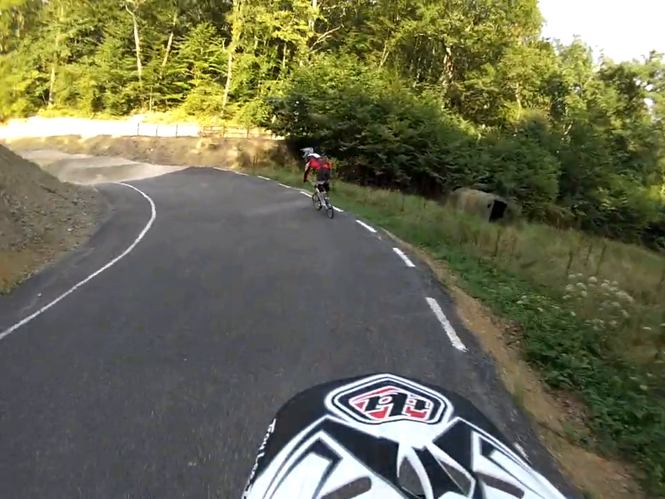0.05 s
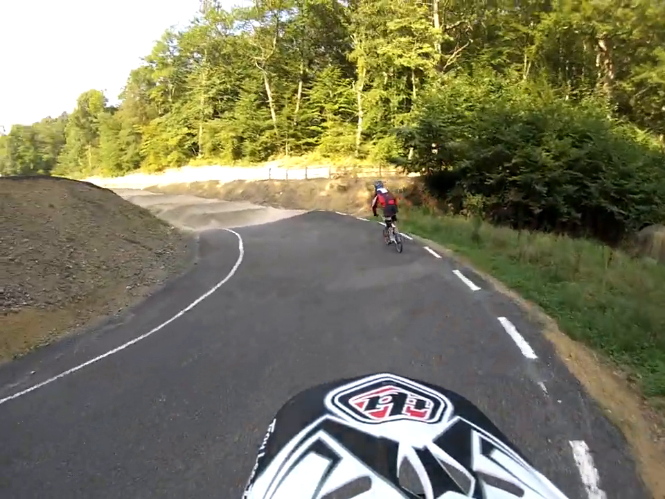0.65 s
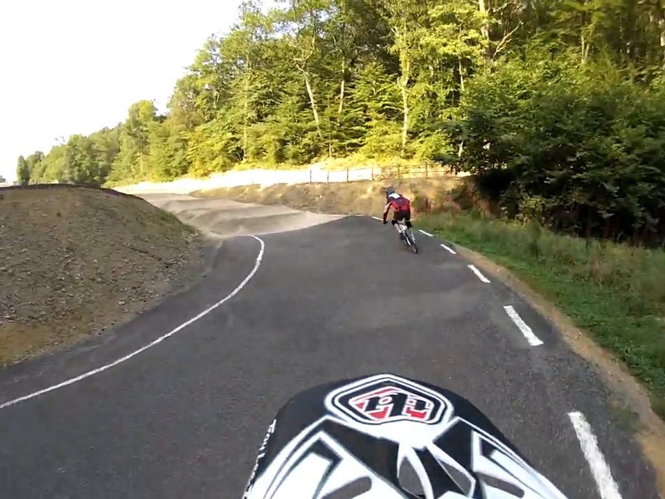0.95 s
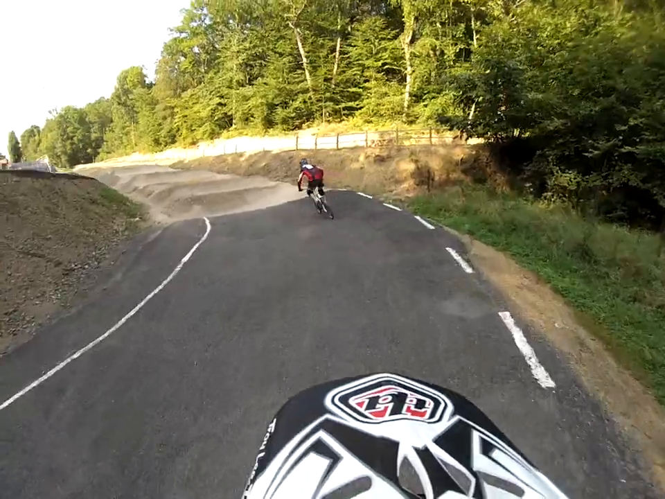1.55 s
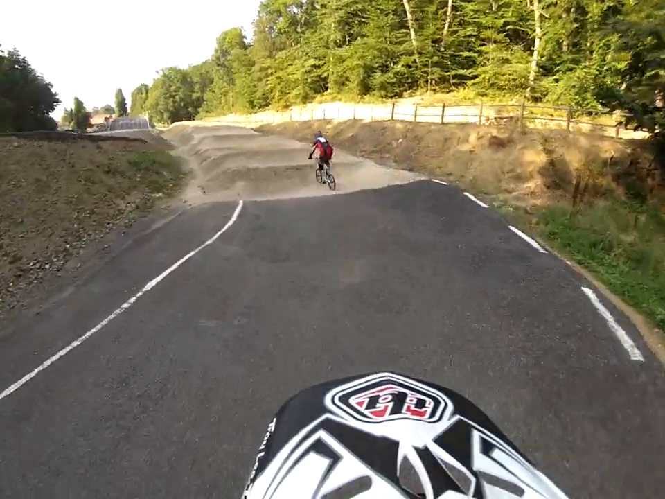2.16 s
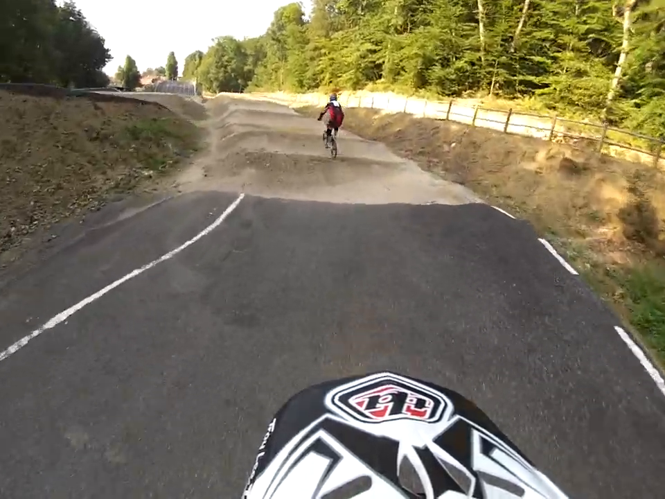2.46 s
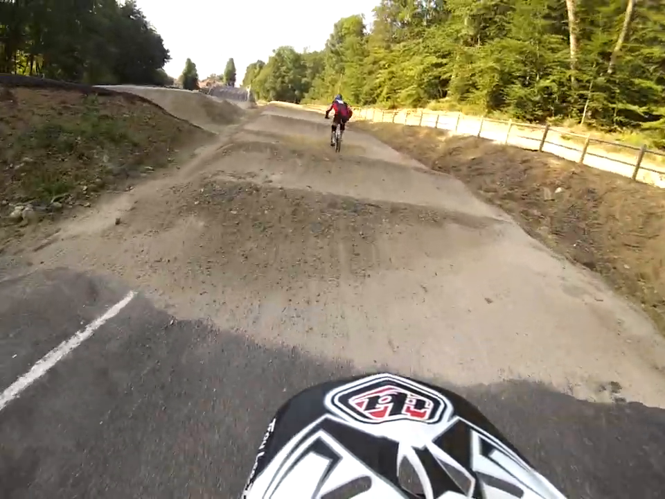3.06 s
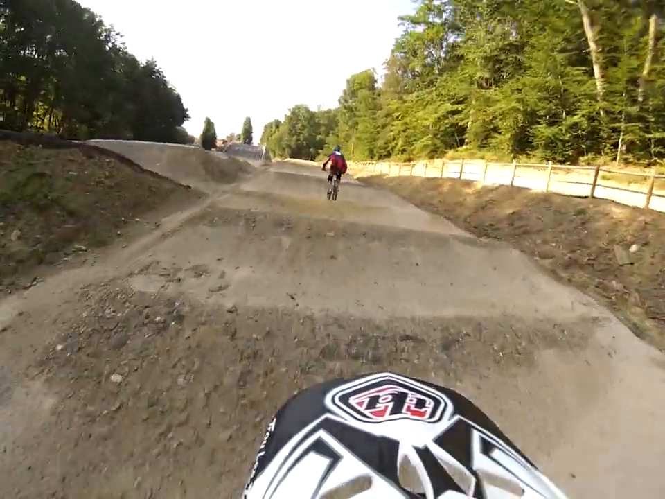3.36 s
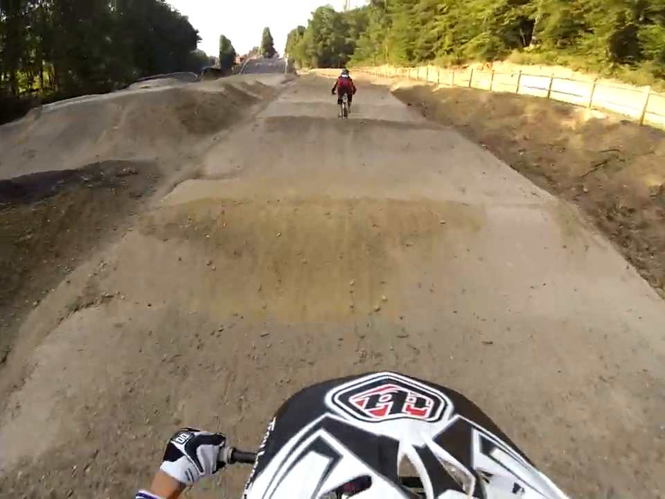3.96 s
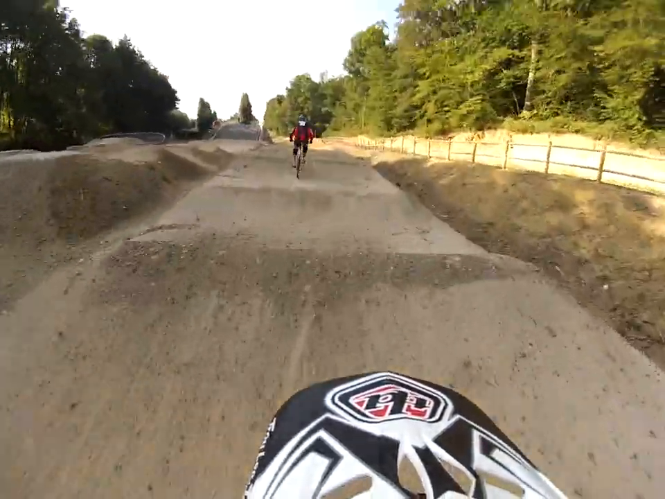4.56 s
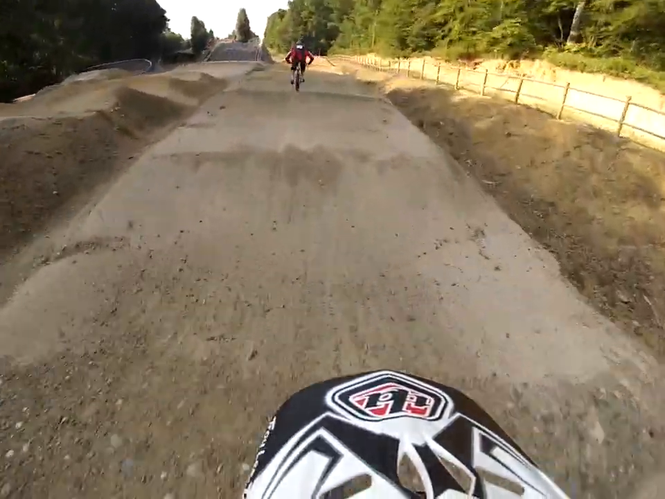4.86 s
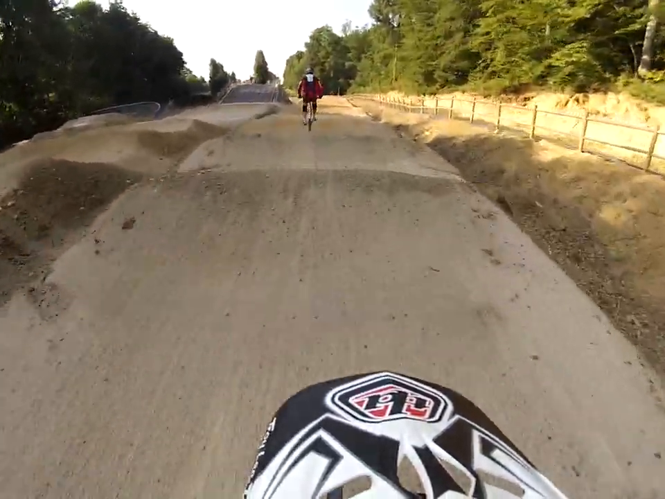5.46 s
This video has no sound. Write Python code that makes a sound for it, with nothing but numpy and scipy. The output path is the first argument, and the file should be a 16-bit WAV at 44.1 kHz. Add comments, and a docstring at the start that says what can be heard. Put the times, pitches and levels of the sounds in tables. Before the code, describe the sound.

Wind rumbles on the microphone as a bicycle rolls from pavement onto dirt, with gritty tyre noise, chain clacks and one sharp knock.

```python
"""Wind buffets a helmet camera's microphone as a bicycle rounds a paved banked turn onto dirt rollers.
Right at the housing, eddies rumble and slap, harder out of the turn. A rider's height below, the tyres
roar and scrub through grit as the rollers load them, the chain clacks on the frame, bumps thump and
stones ping; over one roller a sharp knock rings through the bike. Faint behind it all are a fine
crackle, the freewheel ticking through the turn and air whistling past an edge."""
import sys
import numpy as np
from scipy import signal
from scipy.fft import rfft, irfft, next_fast_len
from scipy.io import wavfile
from scipy.ndimage import uniform_filter1d, map_coordinates

SR = 44100
rng = np.random.default_rng(int(sys.argv[2]) if len(sys.argv) > 2 else 0)


def persist_wave(psi):
    """Save psi, clipped to +-1, as 16-bit WAV."""
    counts = np.round(np.clip(psi, -1, 1) * 32767).astype(np.int16)
    wavfile.write(sys.argv[1], SR, np.atleast_2d(counts).T)


N = 247842


# wind at the microphone, low in the sheltered turn: time_s, level_db
WIND_LEVEL = [(0, -25), (.48, -28), (.55, -19.5), (.63, -21.5), (.85, -26.5), (1.0, -29), (1.25, -29.5),
              (1.55, -26), (1.78, -27.5), (1.84, -16.5), (2.1, -17.5), (2.4, -18), (2.95, -16), (3.2, -20),
              (3.26, -20.5), (3.33, -17), (3.53, -18), (3.59, -21), (3.68, -15.5), (3.95, -17),
              (4.09, -24.5), (4.32, -17.5), (4.66, -16.5), (5.02, -22), (5.12, -15), (5.21, -17),
              (5.3, -17.5), (5.62, -16)]
# gusts (+) and lulls (-) of the small eddies: peak_s, gain_db, half_length_s
GUSTS = [(.35, 3, 0.13), (.66, -3, 0.12), (1.2, -0.5, .25), (1.64, 5.5, 0.1), (2.2, 3, 0.12),
         (2.8, -3, 0.36), (3.2, 3.5, 0.13), (3.53, 4.5, 0.032), (3.8, -6, 0.062), (3.96, 11, 0.011),
         (4.46, -4, 0.031), (4.66, 8.5, 0.019), (4.945, 11, 0.024), (5.35, 1.5, 0.22)]
# spectra of large eddies on the straight, large ones in the turn, and small ones: frequency_hz, level_db
FAST_BUFFET = [(8, -14), (18, 0), (30, 5.5), (52, 2), (72, -4.5), (100, -15.5), (200, -40), (400, -99),
               (1500, -120)]
SLOW_BUFFET = [(8, -7.5), (18, -7.5), (32, 1.5), (50, -5), (72, -18), (110, -26.5), (190, -27.5),
               (330, -72), (1500, -120)]
RUSH = [(40, -12), (80, 1.5), (120, -3), (180, -6.5), (260, -11.5), (400, -19.5), (700, -27.5), (1500, -47),
        (4000, -87), (10000, -120)]

def wind(rush_db=-7.5, lumps_db=3, evenness=0.57, lull_db=1.0, turn_flutter_db=0.77):
    """Large eddies rock the housing, quicker as airspeed grows; small ones tear off in lumps and gusts."""
    level, = curves(WIND_LEVEL)
    exposure = airspeed() ** 2
    eddies = np.sqrt(exposure) * noise(FAST_BUFFET) + np.sqrt(1 - exposure) * noise(SLOW_BUFFET)
    # the buffeting is even: its strength changes little from one eddy to the next
    power = uniform_filter1d(eddies ** 2, size=SR // 18)
    power = np.abs(uniform_filter1d(power, size=SR // 200)) + 1e-6
    buffet = unit(eddies / power ** (evenness / 2))
    rush = unit(noise(RUSH) * amp(lumps_db * wobble(55)))
    flutter = (lull_db + turn_flutter_db * (1 - exposure)) * wobble(18)
    return amp(level + flutter) * (buffet + amp(rush_db + swells(GUSTS)) * rush)


def airspeed(sheltered_db=-29.5, open_db=-17):
    """0 when sheltered in the turn, 1 in the full wind of the straight."""
    return np.clip((curves(WIND_LEVEL)[0] - sheltered_db) / (open_db - sheltered_db), 0, 1)


# the hardest eddies, right at the microphone: time_s, tick_db, thump_db
SLAPS = [(2.254, -40.5, -9.5), (2.379, -45, -7.5), (2.4542, -47, -9), (2.5002, -34, -4), (2.58, -46, -10.5),
         (2.667, -43, -13.5), (2.764, -47, -9.5), (2.9098, -44.5, -13), (2.982, -47, -10),
         (3.091, -46, -8.5), (3.334, -48, -10), (3.5305, -35, -1.5), (3.673, -45.5, -14),
         (3.7055, -44, -22), (3.976, -46, -12.5), (4.3976, -42, -11), (4.437, -42, -15), (4.7715, -46, -18),
         (4.846, -46, -9), (4.9452, -41.5, -6), (5.373, -42, -4.5), (5.455, -44, -3)]
# spectrum of the faint tick as a wind thump overloads the microphone,
# also of a hard chain clack's crack: frequency_hz, level_db
CRACK = [(500, -30), (1500, 11), (5000, -3.5), (7300, -7), (9300, -9.5), (12500, -11), (16000, -25)]

def slaps(tick_gain_db=2, push_s=0.0024, tick_s=0.00114, light_tick_db=-53, light_thump_db=-20):
    """An eddy gives one short pressure push and a faint tick; light ones come by chance in strong wind."""
    out, t = np.zeros(N), np.arange(-(SR // 50), SR // 50) / SR
    speed = airspeed()
    light = [(s, light_tick_db, light_thump_db) for s in chance_times(rate=3) if speed[int(s * SR)] > .8]
    push = (1 - (t / push_s) ** 2 / 2) * np.exp(-(t / push_s) ** 2 / 2)
    for s, tick_db, thump_db in SLAPS + light:
        thump = amp(thump_db) * push * rng.choice([-1, 1])
        tick = colour(rng.standard_normal(len(t)), CRACK) * np.exp(-(t / tick_s) ** 2)
        add(out, s + t[0] + tick_s, thump + amp(tick_db + tick_gain_db) * tick)
    return out


# tyre roar from speed and surface alone, a rider's height below the microphone: time_s, level_db
ROLLING = [(0, -43.5), (.9, -47), (1.4, -45.5), (1.9, -42.5), (2.3, -39.5), (2.55, -45.5), (2.9, -39.5),
           (3.5, -41), (4.0, -42.5), (5.62, -45)]
# spectra of the roaring casing and of the tread scrubbing through grit: frequency_hz, level_db
ROAR = [(150, -9), (330, -3), (530, -4.5), (650, 1), (800, -4), (1020, -3), (1220, -11.5), (1480, -18),
        (1900, -19), (2600, -24.5), (4000, -31.5), (8000, -74)]
GRIT = [(500, -22.5), (1100, 6.5), (1480, -2), (1900, 5.5), (2350, -6.5), (2850, 0), (3500, -0.5),
        (4050, -13.5), (5400, -9), (6500, -23), (7600, -22), (9200, -40), (12000, -38), (15000, -48)]

def tyres(roar_db=-0.5, paved_db=-59, dirt_db=-58, dirt_from_s=2.6, edge_s=0.16, stones_per_s=260):
    """The casing roars, the tread scrubs and flicks small stones; both swell as the ground loads them."""
    rolling, = curves(ROLLING)
    loose, = curves([(dirt_from_s - edge_s, paved_db), (dirt_from_s + edge_s, dirt_db)])
    roar_gain, grit_gain = loading()
    surface = amp(2.06 * wobble(60) + wobble(12))  # fine texture and wider patches
    hits = rng.random(N) < stones_per_s / SR
    sizes = np.minimum(rng.exponential(size=N), 3) * rng.choice([-1, 1], size=N)
    scrub = unit(noise(GRIT) + colour(hits * sizes, GRIT))
    casing = unit(noise(ROAR) * amp(0.5 * wobble(130)))
    return surface * (amp(rolling + roar_gain + roar_db) * casing + amp(loose + grit_gain) * scrub)


# the ground presses the tyres (+) or drops away (-): peak_s, roar_gain_db, grit_gain_db, rise_s, fall_s
ROLLERS = [(.54, 5.5, -5, 0.046, 0.035), (1.31, 4.5, 7, 0.037, 0.068), (1.61, 7.5, 5, 0.12, 0.12),
           (2.91, 4, 6, 0.017, 0.019), (3.05, -5, -7, 0.032, 0.031), (3.17, 4.5, 7, 0.053, 0.064),
           (3.29, 8, 6.5, 0.037, 0.063), (3.36, -4, 6.5, 0.034, .04), (3.44, 6.5, 16.5, 0.072, 0.025),
           (3.51, 14, 14.5, 0.063, 0.023), (3.62, 1, 2, .03, .04), (3.75, -12, -11, 0.068, 0.058),
           (4.18, 9.5, 11.5, 0.086, 0.11), (4.36, 9, 7.5, 0.092, 0.039), (4.44, -5, -0.5, 0.033, 0.047),
           (4.62, -1.5, 8.5, 0.07, 0.15), (5.0, -6, -6.5, 0.22, 0.033), (5.09, -10, 7, 0.059, 0.07),
           (5.255, 12, 10.5, 0.16, 0.18)]

def loading():
    """Gains in dB of the tyre roar and of the grit as the ground presses and releases the bike."""
    return sum(np.outer([roar, grit], swell(s, rise, fall)) for s, roar, grit, rise, fall in ROLLERS)


# the clearest chain clacks, below and behind the microphone: start_s, level_db, pitch_hz, bright_db
CLACKS = [(0.096, -42, 1720, -2), (0.246, -46.5, 1900, -2.5), (0.2755, -46, 1870, -1),
          (0.364, -44, 1890, -6), (0.389, -46, 2100, -18), (0.418, -45.5, 1870, -11),
          (0.996, -45.5, 2110, -4), (1.3053, -39, 1750, -22), (1.4284, -44, 1950, -7),
          (1.4603, -49, 1750, -17), (1.533, -40, 2600, -19), (1.7796, -37.5, 2500, -10),
          (1.796, -39.5, 1820, -2), (1.844, -38, 2190, -3), (1.8714, -38.5, 1990, -15),
          (1.977, -44, 2050, -9), (2.1494, -32, 2460, -11), (2.2865, -41.5, 2110, -3.5),
          (2.3037, -46, 1750, -7), (2.3523, -44, 1870, -2), (2.5697, -44.5, 2130, -7),
          (2.709, -44.5, 2050, -11), (2.774, -38.5, 2560, -6.5), (3.003, -41.5, 2000, -5),
          (3.065, -44, 2400, -13), (3.1107, -44.5, 1880, -7), (3.136, -40.5, 2120, -10),
          (3.2962, -30.5, 2420, -12), (3.4331, -25, 2540, -10.5), (4.1758, -34, 2200, -7),
          (4.2417, -38, 2390, -8), (4.358, -36.5, 1750, -28), (4.4968, -35.5, 2310, -16),
          (4.516, -28.5, 2340, -19), (4.5344, -49, 1710, -2), (4.5804, -43.5, 1700, -7),
          (4.6194, -33.5, 2200, -14), (4.6965, -30, 2270, -22), (4.822, -46, 1690, -27),
          (4.944, -37.5, 1495, -13.5), (5.073, -34, 2350, -15), (5.0837, -36, 1870, -5),
          (5.203, -36, 1750, -17), (5.2261, -26, 2290, -12), (5.2704, -15.5, 1846, -36),
          (5.2876, -19.5, 2170, -36), (5.3247, -31, 2360, -16)]
# the frame's modes under the chain, from low thud to thin ping: pitch_hz, level_db, t60_s
FRAME_THUD = [(727, -20, 0.011), (890, -1.5, 0.013), (1107, 13, 0.026)]
FRAME_BODY = [(1460, 2.8, 0.0032), (1750, 11.8, 0.0099), (2050, 9.5, 0.0093), (2520, 6.7, 0.011),
              (3175, 0.92, 0.0094)]
FRAME_BRIGHT = [(3430, 5.4, 0.0082), (4000, 15, 0.0014), (5220, 5.9, 0.0087), (6730, 3.6, 0.0017)]
FRAME_PING = [(5770, -4, 0.0078), (6400, 0, 0.012)]
# spectrum of links or a stone scraping the bike: frequency_hz, level_db
SCRAPE = [(800, -2), (2500, 12), (4400, 6), (5500, 3), (6600, -17), (8000, -21), (9500, -23), (12500, -18),
          (16000, -28)]
TAP_HZ = 2050  # centre pitch of the light chain taps

def chain(clean_ring_db=-18, hard_thud_db=-14, thud_db_per_octave=-22, crack_db=-20, ping_db=-23):
    """Light taps thud dryly; hard ones crack, ping and ring at a pitch set by where the chain lands."""
    out, t = np.zeros(N), np.arange(SR // 20) / SR
    onset = 1 - np.exp(-(t / .0011) ** 2)
    for s, db, hz, bright_db in CLACKS + taps():
        # a clack rings cleanly once its level less its brightness passes clean_ring_db
        hardness = .84 / (1 + np.exp((clean_ring_db - (db - bright_db)) / 4))
        thud_db = hardness * hard_thud_db + thud_db_per_octave * np.log2(hz / TAP_HZ)
        tone = burst(onset * ring([(hz, 0, 0.015)], t, spread=0))
        # the links rattle for a few ms as they settle on the frame
        links = (t == 0) + .16 * rng.standard_normal(len(t)) * decay(t, t60=.02)
        body = burst(np.sqrt(hardness) * tone + np.sqrt(1 - hardness) * rattle(links, FRAME_BODY, t))
        scrape = burst(dying_noise(SCRAPE, t, t60=.075))
        crack = amp(crack_db) * burst(dying_noise(CRACK, t, t60=0.012))
        ping = amp(ping_db) * burst(ring(FRAME_PING, t, spread=0.34))
        treble = burst(rattle(links, FRAME_BRIGHT, t) + amp(-2) * scrape)
        frame = body + amp(thud_db) * rattle(links, FRAME_THUD, t) + amp(bright_db - 1) * treble
        add(out, s, amp(db) * (frame + hardness * (crack + ping)))
    return out


def taps(tap_db=-52.5, bright_db=-7, with_grit=0.81, turn_db=-23, scatter_hz=200):
    """The slack chain taps lightly, harder where the ground shakes the bike: rows like those of CLACKS."""
    level = tap_db + with_grit * loading()[1] + turn_db * (1 - airspeed())
    return [(s, level[int(s * SR)], rng.normal(TAP_HZ, scatter_hz), bright_db)
            for s in chance_times(rate=2.3)]


# modes of frame and housing under the knock: pitch_hz, level_db, t60_s
KNOCK_RING = [(720, -11.5, 0.039), (992, -16, 0.06), (1210, -12, 0.027), (1604, -7, 0.019),
              (1870, -2, 0.012), (2720, -22, 0.033), (2940, -15, 0.016), (3360, -20, 0.016),
              (3570, -18, 0.022), (3960, -10, 0.029), (4350, -9.5, 0.015), (4860, -9.5, 0.013),
              (5260, -11.5, 0.015), (6240, -12, 0.0081), (7440, -5, 0.0059), (10260, -16, 0.0042),
              (12600, -15, 0.0043), (15000, -35, 0.004)]
# spectrum of its crack: frequency_hz, level_db
KNOCK_CRACK = [(1000, -6), (2200, 7), (5000, -2), (6300, -7), (7600, -2), (10000, -7), (12500, -3),
               (16000, -13)]

def knock(start_s=4.1932, ring_db=-1, crack_db=-13):
    """A hard contact: a thin bright crack, then the frame and housing ring briefly."""
    out, t = np.zeros(N), np.arange(SR // 10) / SR
    crack = dying_noise(KNOCK_CRACK, t, t60=.009)
    add(out, start_s, amp(ring_db) * ring(KNOCK_RING, t, spread=0) + amp(crack_db) * crack)
    return out


# bumps in the track, passed up from tyres to frame: start_s, level_db
BUMPS = [(.53, -37), (2.335, -29.5), (3.574, -30), (4.2924, -28), (4.358, -25.5), (4.943, -42),
         (5.082, -29)]
# hollow modes of wheel and frame: pitch_hz, level_db, t60_s
BUMP_RING = [(400, 6.5, 0.022), (655, 6, 0.028), (800, 3, 0.02), (930, 0, 0.025), (1117, 0, 0.015)]

def bumps(shudder=0.22):
    """A tyre strikes a bump and shudders over it; wheel and frame answer with a hollow thump."""
    out, t = np.zeros(N), np.arange(SR // 8) / SR
    for s, db in BUMPS:
        push = (t == 0) + shudder * rng.standard_normal(len(t)) * decay(t, t60=0.073)
        add(out, s, amp(db) * rattle(push, BUMP_RING, t, spread=0.18))
    return out


# brief skids down at ground level: peak_s, level_db, rise_s, fall_s
SCUFFS = [(1.304, -44.5, 0.015, 0.011), (3.44, -38, 0.029, .04), (3.52, -41.5, 0.042, 0.019),
          (4.18, -33, 0.011, 0.026), (4.62, -40.5, 0.016, 0.015), (5.211, -39, 0.0069, 0.053),
          (5.295, -39, 0.028, 0.03)]
# spectrum of crushed gravel: frequency_hz, level_db
GRAVEL = [(500, -11), (1200, 4.5), (2600, 5), (3400, -0.5), (4300, -6.5), (6300, -9.5), (9000, -30),
          (15000, -38)]

def scuffs(grains_per_s=900, smooth_db=-7):
    """Gravel gives way under the tread in a spray of tiny snaps."""
    grains = (rng.random(N) < grains_per_s / SR) * rng.standard_normal(N)
    spray = unit(noise(GRAVEL) * amp(smooth_db) + colour(grains, GRAVEL))
    return spray * sum(amp(db) * swell(s, rise, fall) for s, db, rise, fall in SCUFFS)


# stones striking the bike below the microphone: start_s, level_db, pitch_hz
STONE_HITS = [(0.21, -51, 4160), (0.82, -52.5, 5140), (1.24, -53, 5250), (1.5343, -37.5, 4340),
              (2.1078, -45, 5070), (2.287, -48, 5430), (2.694, -48, 4520), (2.823, -52, 5200),
              (4.2407, -50, 6540)]
# modes of such a strike: pitch_ratio, level_db, t60_s
STONE_RING = [(.56, -6, 0.008), (.72, 1, 0.0086), (.86, -7, .006), (1, 8, 0.011), (1.17, -3, 0.0055)]

def stones():
    """A stone flicked off the tread gives a short high ping within a dry scratch."""
    out, t = np.zeros(N), np.arange(SR // 25) / SR
    for s, db, hz in STONE_HITS:
        ping = burst(ring(np.array(STONE_RING) * [hz, 1, 1], t, spread=.5))
        scratch = burst(dying_noise(SCRAPE, t, t60=0.025))
        add(out, s, amp(db) * burst(ping + scratch))
    return out


# short, faint broadband ticks: start_s, level_db
TICKS = [(2.165, -52), (2.408, -53.5), (2.572, -55), (2.703, -58), (2.715, -55.5), (2.78, -52),
         (2.789, -57), (2.8195, -53), (2.939, -56), (3.017, -56.5), (3.2925, -52.5), (3.536, -51),
         (4.176, -45), (4.181, -42), (4.448, -55), (4.537, -55), (4.589, -52), (4.666, -57), (4.682, -58),
         (4.6955, -55), (5.082, -50), (5.087, -48.5), (5.122, -59), (5.227, -36.5), (5.275, -46.5),
         (5.4385, -62), (5.551, -59)]
# spectrum of a tick: frequency_hz, level_db
TICK_SPECTRUM = [(800, -1), (2000, 12.5), (3500, 1), (5500, 4), (7500, -3.5), (12500, -7), (14500, -11),
                 (16000, -24)]

def crackle(fine_db=-61, scatter_db=3, with_grit=0.63, turn_db=-14):
    """Short, faint broadband ticks over a fine crackle that grows with speed and load."""
    out, t = np.zeros(N), np.arange(SR // 100) / SR
    level = fine_db + with_grit * loading()[1] + turn_db * (1 - airspeed())
    fine = [(s, rng.normal(level[int(s * SR)], scatter_db)) for s in chance_times(rate=34, count=200)]
    for s, db in TICKS + fine:
        add(out, s, amp(db) * burst(rng.standard_normal(len(t)) * decay(t, t60=.005)))
    return np.std(out) * colour(out, TICK_SPECTRUM)


# the coasting rear hub, faint from up on the helmet: time_s, clicks_per_s, level_db
COAST = [(0, 66, -68), (.47, 72, -69), (.52, 86, -64), (.6, 102, -64), (.68, 54, -65), (.86, 64, -65.5),
         (.97, 69, -62), (1.1, 60, -66.5), (1.3, 60, -70), (2.0, 52, -71), (3.0, 52, -88)]
# modes of a pawl: pitch_hz, level_db, t60_s
PAWL = [(3350, -2, .006), (5150, 0, .004), (5750, -1, .005), (7900, -10, .004)]
# spectrum of the spinning hub's sheen: frequency_hz, level_db
SHEEN = [(2000, -24), (3300, 13), (4200, -2), (5600, -15), (6700, -22), (7900, 2), (9200, -12), (13000, -3),
         (15500, -19)]

def freewheel(sheen_db=-4, scatter_db=1.5):
    """Pawls drop over the ratchet teeth, slower as the bike climbs the banking; the hub adds a sheen."""
    rate, db = curves(COAST)
    clicks, t = np.zeros(N), np.arange(SR // 80) / SR
    teeth_passed = np.floor(np.cumsum(rate) / SR)
    for s in np.flatnonzero(np.diff(teeth_passed)) / SR:
        add(clicks, s, amp(scatter_db * rng.standard_normal()) * burst(ring(PAWL, t, spread=.3)))
    return amp(db) * (clicks + amp(sheen_db) * noise(SHEEN))


# swells of a thin airy whistle: peak_s, gain_db, half_length_s
WHISTLES = [(3.88, 11, 0.085), (4.25, 9, 0.38), (4.9, 12, 0.077), (5.03, 6, 0.045), (5.62, 13, 0.043)]
# the faint hiss in the background: time_s, level_db
HISS_LEVEL = [(0, -63.5), (1.0, -65.5), (1.2, -67.5), (1.8, -66), (2.25, -64), (2.6, -71), (2.9, -67),
              (3.2, -66), (4.4, -68.5), (4.78, -71), (4.95, -68.5), (5.25, -65.5), (5.45, -70)]
# its spectrum: frequency_hz, level_db
HISS = [(1000, -13), (3400, 4), (4000, 9.5), (5800, 7), (6800, 2), (7900, 0), (9300, -1.5), (11800, 0),
        (14000, -6), (15500, -13.5)]

def air(whistle_hz=3000, width_hz=200, whistle_db=-68, flutter_db=0.5, with_grit=0.36, with_whistle=0.33):
    """Air whistles unsteadily past an edge; a faint hiss swells with the whistle and the tyre load."""
    band = filtered(rng.standard_normal(N), lambda hz: 1 / (1 + ((hz - whistle_hz) / width_hz) ** 2))
    whistle = amp(whistle_db + swells(WHISTLES) - flutter_db * wobble(21)) * unit(band)
    hiss_db = curves(HISS_LEVEL)[0] + with_grit * loading()[1] + with_whistle * swells(WHISTLES)
    return whistle + amp(hiss_db) * noise(HISS)


def amp(db):
    """Decibels to gain."""
    return 10 ** (np.asarray(db) / 20)


def unit(x):
    """Scale to rms 1."""
    return x / np.sqrt(np.mean(x ** 2) + 1e-20)


def burst(x):
    """Scale a short sound to the energy of 8 ms at rms 1."""
    return x / np.sqrt(np.sum(x ** 2) / (.008 * SR))


def curves(rows):
    """One value per sample for each column after the time."""
    s, *cols = np.transpose(rows)
    return [np.interp(np.arange(N) / SR, s, c) for c in cols]


def wobble(rate):
    """A smooth random curve, rate knots a second."""
    return map_coordinates(rng.standard_normal(int(N * rate / SR) + 4), [np.arange(N) * rate / SR])


def swell(s, rise, fall):
    """A bell curve that climbs to 1 at time s and sinks again."""
    t = np.arange(N) / SR - s
    return np.exp(-(t / np.where(t < 0, rise, fall)) ** 2)


def swells(rows):
    """Summed dB of even swells given as peak_s, gain_db, half_length_s."""
    return sum(db * swell(s, half, half) for s, db, half in rows)


def decay(t, t60):
    """A fall of 60 dB every t60 seconds."""
    return amp(-60 * t / t60)


def chance_times(rate, count=60):
    """Loosely spaced moments, about rate a second."""
    times = (np.arange(count) + rng.random(count)) / rate
    return times[times < (N - 1) / SR]


def filtered(x, response):
    """x times a response of frequency."""
    m = next_fast_len(len(x) + SR // 4)
    return irfft(rfft(x, m) * response(np.fft.rfftfreq(m, 1 / SR)), m)[:len(x)]


def colour(x, spectrum):
    """x shaped by points of frequency_hz, level_db, at rms 1."""
    f, db = np.transpose(spectrum)
    return unit(filtered(x, lambda hz: amp(np.interp(np.log(hz + 1), np.log(f), db))))


def noise(spectrum):
    """Coloured noise of rms 1."""
    return colour(rng.standard_normal(N), spectrum)


def dying_noise(spectrum, t, t60):
    """Coloured noise that starts at once and dies away."""
    return colour(rng.standard_normal(len(t)), spectrum) * decay(t, t60)


def ring(modes, t, spread):
    """Damped modes; spread sets how much their strengths vary from blow to blow."""
    hz, db, t60 = np.transpose(modes)[:, :, None]
    strength = 1 + spread * rng.uniform(-1.87, 1, hz.shape)
    sign = (-1) ** np.arange(len(hz))[:, None]
    return np.sum(sign * strength * amp(db) * decay(t, t60) * np.sin(2 * np.pi * hz * t), axis=0)


def rattle(force, modes, t, spread=.5):
    """Modes driven by an uneven force, scaled as a burst."""
    return burst(signal.fftconvolve(force, ring(modes, t, spread))[:len(t)])


def add(track, s, sound):
    """Mix a sound into the track at time s."""
    part = track[max(round(s * SR), 0):][:len(sound)]
    part += sound[:len(part)]


def scene():
    """Everything reaches the one microphone on the helmet."""
    riding = wind() + tyres() + freewheel() + air() + scuffs() + crackle()
    impacts = knock() + chain() + stones() + bumps() + slaps()
    return (riding + impacts)[None]


def record(dry):
    """The camera rounds off the highest peaks and cuts the treble above its band limit."""
    ceiling, top_hz = .9, 15900
    rounded = dry[0] / (1 + np.abs(dry[0] / ceiling) ** 6) ** (1 / 6)
    return filtered(rounded, lambda hz: 1 / (1 + (hz / top_hz) ** 80))[None]


dry = scene()
out = record(dry)
persist_wave(out)
```